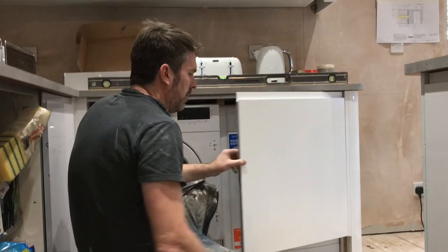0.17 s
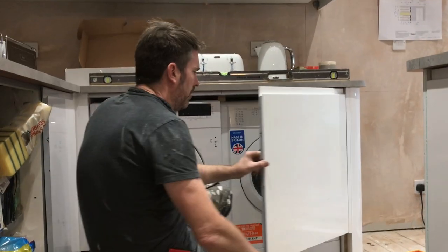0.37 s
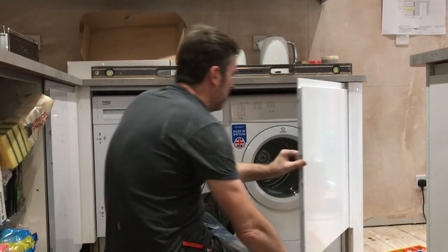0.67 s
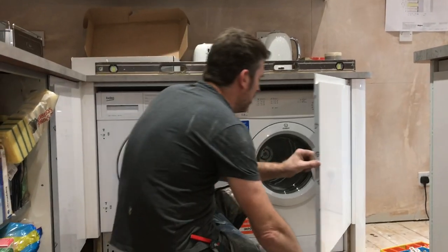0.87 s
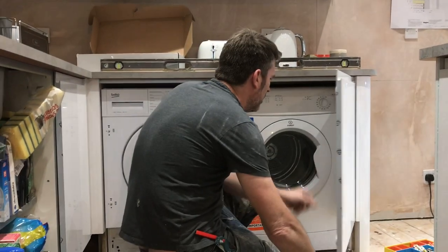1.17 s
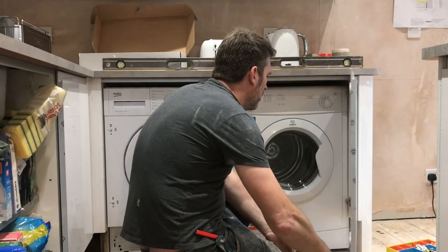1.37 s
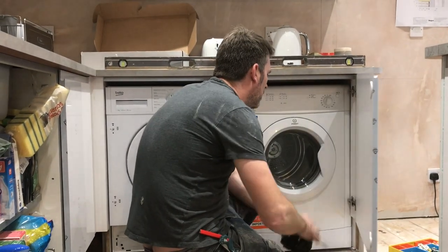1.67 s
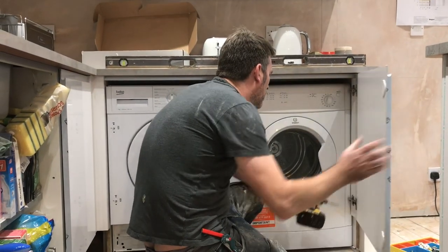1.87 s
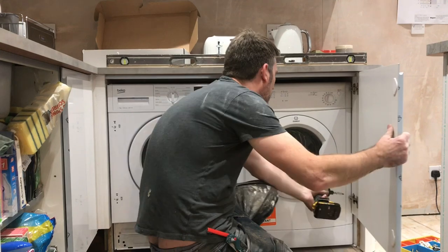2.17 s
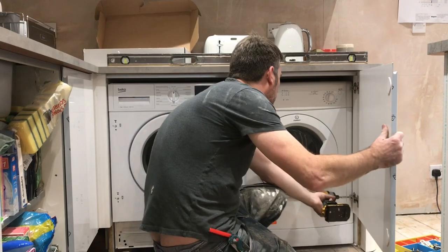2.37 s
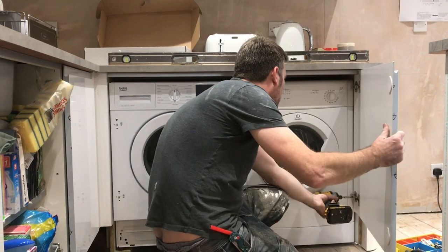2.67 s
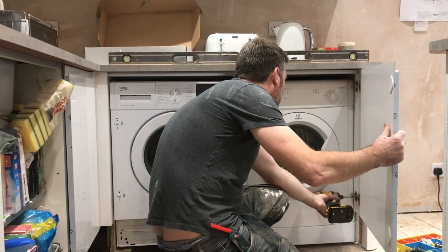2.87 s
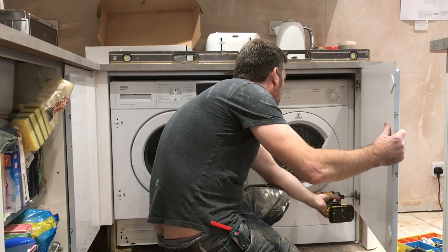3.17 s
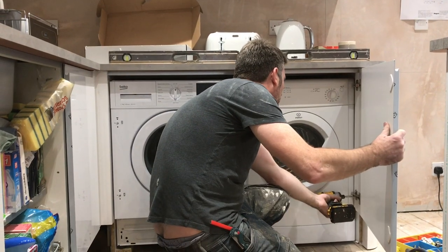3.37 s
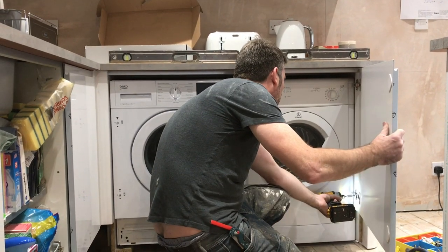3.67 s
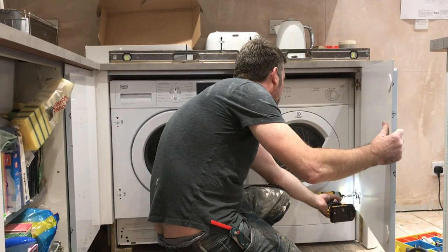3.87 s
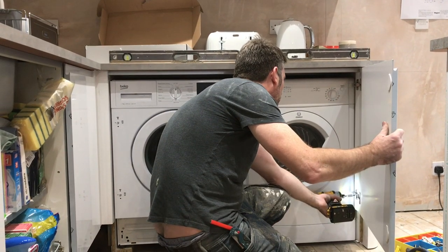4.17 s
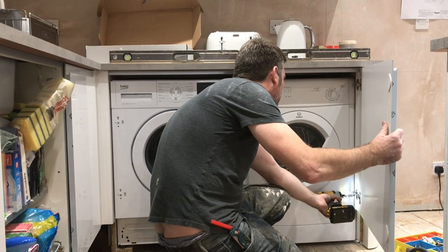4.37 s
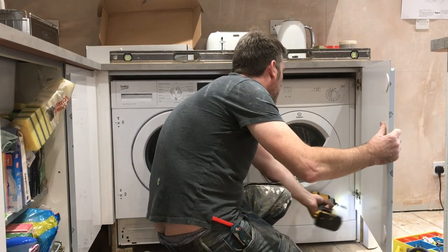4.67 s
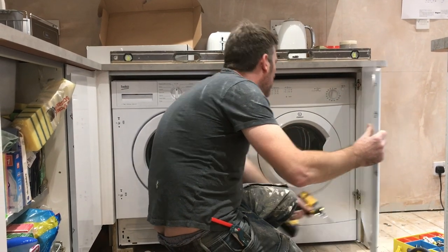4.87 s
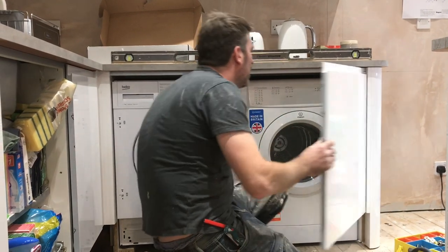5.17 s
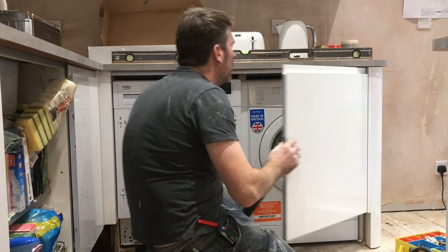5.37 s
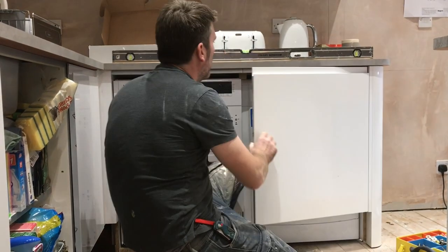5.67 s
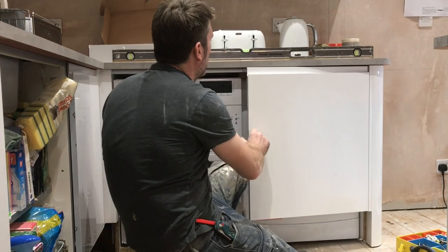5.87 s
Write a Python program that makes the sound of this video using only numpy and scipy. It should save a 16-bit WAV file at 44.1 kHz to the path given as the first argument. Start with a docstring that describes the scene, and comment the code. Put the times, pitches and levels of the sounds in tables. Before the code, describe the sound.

In a small, lightly echoing kitchen, a cabinet door opens with a loud sharp knock, rattle and dull thumps. Clothes rustle, a hinge groans briefly, and a drill scrapes across floorboards. Small clicks precede a short, quiet drill whine with grinding gears and a final growl. Soft taps and heavy dull thumps close the door. The microphone is fairly near, over a faint low hum.

```python
"""A cabinet door in a small kitchen is pulled open with a sharp knock and a rattle, and its hinge groans briefly.
Its panel cracks and rings, and dull thumps, soft taps and small clicks follow, each built from fading tones and noise.
A cordless drill is dragged off the ringing floorboards in irregular slips, its bit clicks into a hinge screw and
turns it slowly: steady whining tones, grinding gear noise and a growl. The door is pushed shut with taps and thumps.
Clothes rustle as shaped noise, over room air and a low hum."""
import sys
import numpy as np
from scipy import signal
from scipy.fft import rfft, irfft, next_fast_len
from scipy.io import wavfile
from scipy.ndimage import map_coordinates

SR = 44100
rng = np.random.default_rng(int(sys.argv[2]) if len(sys.argv) > 2 else 0)


def transcribe(signal):
    """Save signal, clipped to [-1, 1], as a 16-bit WAV file at the path in sys.argv[1]."""
    frames = np.atleast_2d(signal).T
    limited = np.clip(frames, -1, 1)
    pcm = np.round(limited * 32767).astype(np.int16)
    wavfile.write(sys.argv[1], SR, pcm)


N = 264732
TIME = np.arange(N) / SR
HIT = np.arange(SR // 2) / SR  # seconds since a blow
HIT_HZ = np.fft.rfftfreq(len(HIT), 1 / SR)
HOLLOW_HZ = 259  # the hollow answer that follows thumps and taps

# How long the kitchen rings. Each row: pitch in Hz, time to fade by 60 dB in seconds.
ROOM = [(80, 0.45), (250, 0.47), (1000, 0.47), (3000, 0.39), (6000, 0.36), (15000, 0.11)]


def amp(db):
    """Decibels to gain."""
    return 10 ** (np.asarray(db) / 20)


def unit(x):
    """Scale to rms 1."""
    return x / np.sqrt(np.mean(x ** 2) + 1e-20)


def burst(x):
    """Scale to the energy of 10 ms at rms 1."""
    return x * np.sqrt(SR / 100 / np.sum(x ** 2))


def fade(t, t60):
    """Exponential decay of 60 dB in t60 seconds."""
    return amp(-60 * t / t60)


def along(points, hz):
    """Read (Hz, value) points on a log axis."""
    f, v = np.transpose(points)
    return np.interp(np.log(hz + 1e-6), np.log(f), v)


def wobble(rate):
    """A smooth random curve with this many random points a second."""
    return map_coordinates(rng.standard_normal(int(N * rate / SR) + 4), [TIME * rate])


def filtered(x, response):
    """Shape x by a gain that depends on frequency."""
    m = next_fast_len(N + SR // 2)
    hz = np.fft.rfftfreq(m, 1 / SR)
    return irfft(rfft(x, m) * response(hz), m)[:N]


def noise(spectrum):
    """Coloured noise of rms 1."""
    return unit(filtered(rng.standard_normal(N), lambda hz: amp(along(spectrum, hz))))


def resonant(x, modes):
    """Ring x through (Hz, width, dB) resonances, at rms 1."""
    def response(f):
        total = 0
        for k, (center, width, db) in enumerate(modes):
            damping = 1j * f * width
            total = total + (-1) ** k * amp(db) * damping / (center ** 2 - f ** 2 + damping)
        return total
    return unit(filtered(x, response))


def slips(per_s):
    """Irregular little jerks of random size."""
    return (rng.random(N) < per_s / SR) * rng.standard_normal(N)


def swing(hz, t60, rise):
    """One damped tone set going by a soft push."""
    return np.sin(2 * np.pi * hz * HIT) * fade(HIT, t60) * (1 - np.exp(-HIT / rise))


def stroke(start, end, attack, release):
    """Rise over the attack, hold until the end, then lose 60 dB over the release."""
    return np.clip((TIME - start) / attack, 0, 1) * fade(np.maximum(TIME - end, 0), release)


def swell(s, rise, fall):
    """Exponential growth up to time s and decay after it."""
    return np.exp(-np.maximum((s - TIME) / rise, (TIME - s) / fall))


def contact(gain, chatter_db, t60, rise):
    """Surfaces graze, meet after the rise time and chatter away, coloured by the gain."""
    # turn the gain into a filter that never sounds before the blow
    cepstrum = irfft(np.log(np.maximum(gain, 1e-6)))
    half = len(HIT) // 2
    colour = np.exp(rfft(np.r_[cepstrum[0], 2 * cepstrum[1:half]], len(HIT)))
    blow = burst(signal.unit_impulse(len(HIT), round(rise * SR)))
    grazing = np.minimum(HIT / rise, 1) ** 2
    chatter = burst(rng.standard_normal(len(HIT)) * grazing * fade(HIT, t60))
    return burst(irfft(rfft(blow + amp(chatter_db) * chatter) * colour))


def in_room(x, wet_db):
    """The sound plus a fresh random tail of the kitchen, which builds up as the walls answer."""
    hz, t, z = signal.stft(rng.standard_normal(len(HIT)), SR, nperseg=256)
    decay = fade(t, along(ROOM, hz)[:, None])
    tail = signal.istft(z * decay, SR, nperseg=256)[1][:len(HIT)]
    tail = tail * (1 - np.exp(-HIT / 0.0008))
    return x + amp(wet_db) * signal.fftconvolve(x, tail / np.linalg.norm(tail))[:len(x)]


def add(track, s, sound):
    """Mix a sound into the track at time s."""
    part = track[max(round(s * SR), 0):][:len(sound)]
    part += sound[:len(part)]


def knocks(count=3):
    """After each knock the loose door rattles, each contact later, weaker and softer than the last."""
    # Hard knocks of the door. Each row: start in seconds, level in dB, Hz above which the contact is soft.
    knock_rows = [(0.0, -24.5, 5500), (0.018, -30, 4570), (0.040, -16, 12000), (0.093, -33.5, 895),
                  (0.117, -26.5, 1202), (0.154, -35.5, 800), (0.194, -38.5, 780), (0.713, -52.5, 1400),
                  (0.803, -58.5, 2000), (4.679, -50, 3990), (5.492, -46, 2000), (5.733, -41, 2490),
                  (5.777, -50.5, 2560), (5.948, -56, 1500)]
    gap_s, slows, loss_db, softens = .011, 1.5, 9.5, 0.54
    out = np.zeros(N)
    for s, db, soft_hz in knock_rows:
        for k in range(count):
            add(out, s, amp(db - k * loss_db) * knock(soft_hz * softens ** k))
            unevenness = np.exp(0.11 * rng.standard_normal())
            s = s + gap_s * slows ** k * unevenness
    return out


def knock(soft_hz, ring_db=-3, wet_db=-5.5, steepness=.62):
    """The door panel cracks and rings; softer contacts lose their treble."""
    # Colour of the crack. Each row: pitch in Hz, level in dB.
    panel_colour = [(40, -25), (100, -6.5), (180, 0.5), (260, -3.5), (400, -6), (600, -6.5), (900, -7.5),
                    (1150, -12), (1600, -10), (1950, -13), (2500, -16), (3200, -22), (4200, -25.5),
                    (6200, -35), (9000, -36), (16000, -47.5)]
    # Tones at which the door rings. Each row: pitch in Hz, level in dB, time to fade by 60 dB in seconds.
    panel_tones = [(174, 2, .25), (368, -0.5, 0.53), (519.2, 3, 0.083), (679, -5.5, 0.25), (717, -5, 0.45),
                   (812, -1, .3), (867, -4, 0.25), (1039, -13, 0.51), (1125, -9.5, 0.57), (1260, -1.5, .14),
                   (1530, -0.5, 0.26), (1752, -14, .45)]

    def softness(hz):
        return (1 + (hz / soft_hz) ** 2) ** -steepness

    crack_gain = amp(along(panel_colour, HIT_HZ)) * softness(HIT_HZ)
    crack = contact(crack_gain, chatter_db=12, t60=0.04, rise=.002)
    ring = np.zeros(len(HIT))
    for hz, level, t60 in panel_tones:
        push = rng.choice([-1, 1]) * amp(level + rng.normal(0, 2))
        ring += push * softness(hz) * swing(hz, t60, rise=0.0028)
    return in_room(crack, wet_db) + amp(ring_db) * burst(ring)


def thumps(rise=0.0028, body_db=-12, wet_db=-11, corner=3, tiring=1.8, count=3):
    """Padded blows swing the panel, shake the carcass and rebound ever weaker; lower ones are duller."""
    # Dull thumps of door, carcass and floor. Each row: start in seconds, level in dB, pitch in Hz,
    # time between rebounds in seconds, loss per rebound in dB (grows faster later), hollow answer in dB.
    thump_rows = [(0.044, -16.5, 176, .027, 7, -12), (0.086, -27, 105, .02, 15, -18),
                  (0.115, -22, 121, .02, 14, -17), (0.153, -12.5, 126, 0.019, 15, -29),
                  (0.193, -18.5, 140, 0.0097, 13, -22), (0.478, -21.5, 89, .034, 10, -27),
                  (0.579, -36.5, 85, .04, 6, -10), (0.731, -29.5, 95, .045, 12, -18),
                  (0.746, -26.5, 129, .032, 3, -17), (0.796, -28, 82, 0.042, 9.5, -7.5),
                  (0.832, -29.5, 169, 0.038, 22, -11), (1.219, -27, 240.5, .0208, 4.5, -20),
                  (2.11, -49.5, 70, .05, 10, -8.5), (3.346, -41.5, 154, .04, 7, -12),
                  (3.865, -36.5, 161.5, 0.032, 5, -14), (4.68, -34.5, 86, .04, 1, -17.5),
                  (5.484, -19, 122, .05, 9, -12), (5.496, -15, 152, .026, 13, -26),
                  (5.723, -15.5, 121.6, 0.067, 4.5, -11.5), (5.757, -25, 185, 0.041, 7, -3),
                  (5.842, -22.5, 114.4, .033, 22, -14), (5.946, -45, 100, .028, 2, -15)]
    # Colour of the shaken carcass. Each row: pitch in Hz, level in dB.
    carcass_colour = [(30, -28), (70, -4), (120, 4.5), (260, -5.5), (450, -22), (850, -24), (1500, -30),
                      (3500, -33.5), (6500, -54.5), (16000, -67.5)]
    swing_t60_s, hollow_t60_s = .1, .15
    out = np.zeros(N)
    for s, db, hz, gap, loss_db, hollow_db in thump_rows:
        padding = 1 / np.sqrt(1 + HIT_HZ / (corner * hz))
        gain = amp(along(carcass_colour, HIT_HZ)) * padding
        hollow = amp(hollow_db) * swing(HOLLOW_HZ, hollow_t60_s, rise)
        tones = swing(hz, swing_t60_s, rise) + hollow
        for k in range(count):
            body = contact(gain, chatter_db=21.5, t60=0.25, rise=0.0054)
            blow = in_room(tones + amp(body_db) * body, wet_db)
            add(out, s + k * gap, amp(db - k ** tiring * loss_db) * blow)
    return out


def taps(rise=0.0024, scuff_db=-10, wet_db=-9, hollow_rise=0.0034):
    """A light tap or a ringing floorboard swells one damped tone with a scuff; a hollow tone answers just after."""
    # Soft taps on wood, and floorboard tones that ring as the drill is dragged (1.280, 1.352).
    # Each row: start in seconds, level in dB, pitch in Hz, time to fade by 60 dB in seconds, hollow answer in dB.
    tap_rows = [(1.280, -40, 531, 0.24, -23), (1.352, -34, 782, 0.038, -22), (1.487, -50, 563, 0.04, -10),
                (1.621, -55, 1130, 0.1, -17), (5.385, -25, 974, 0.027, 0), (5.442, -25, 829, 0.042, 3),
                (5.482, -36, 837, 0.038, -1)]
    # Colour of the scuff. Each row: pitch in Hz, level in dB.
    scuff_colour = [(60, -15), (300, 2), (1000, 0), (1500, -20.5), (4000, -28.5), (6500, -52), (9500, -49),
                    (16000, -52.5)]
    hollow_t60_s, hollow_lag_s = 0.12, 0.00923
    low_swing_hz, low_swing_db = 113, -4  # a deeper tone in the hollow answer
    answer = swing(HOLLOW_HZ, hollow_t60_s, hollow_rise)
    answer += amp(low_swing_db) * swing(low_swing_hz, hollow_t60_s, hollow_rise)
    out = np.zeros(N)
    for s, db, hz, t60, hollow_db in tap_rows:
        scuff = contact(amp(along(scuff_colour, HIT_HZ)), chatter_db=3.5, t60=0.097, rise=.005)
        touch = swing(hz, t60, rise) + amp(scuff_db) * scuff
        add(out, s, amp(db) * in_room(touch, wet_db))
        add(out, s + hollow_lag_s, amp(db + hollow_db) * in_room(answer, wet_db))
    return out


def clicks(snap_wet_db=-2):
    """Small hard parts meet: a pitched clack, a bright snap and a low thud sound together."""
    # Small clicks: a close dry one of clothes or tool belt (0.392), then hinge, bit and screw.
    # Each row: start in seconds, level in dB, pitch in Hz, bright snap in dB,
    # time until the surfaces meet in seconds, room sound in dB.
    click_rows = [(0.392, -48, 2963, -9, .002, -6), (1.328, -58, 2660, -10.5, 0.0077, -11),
                  (1.992, -55.5, 1790, 9, 0.0039, -4), (2.772, -50, 2000, -16.5, .004, -2),
                  (2.834, -51.5, 1900, -22, .006, 1), (3.094, -56, 1990, -33, 0.006, 2),
                  (3.116, -44, 1890, -26, 0.0046, 1), (3.124, -37, 1840, -18, .0033, -4),
                  (3.254, -49.5, 1670, -32, 0.0043, -2), (3.348, -60, 1310, -24, 0.00365, -4),
                  (3.408, -63, 1950, -6, .002, -6), (3.737, -66.5, 2700, 4.5, .0028, -1),
                  (3.861, -39.5, 2930, -6.5, .002, -1.5), (3.916, -58, 2410, -6.5, 0.0014, -10),
                  (4.467, -54.5, 1830, -18, .010, -1.5), (4.908, -65, 1992, -3.5, .004, -3.5),
                  (5.944, -58.5, 1815, -0.5, .007, -0.5)]
    # Colour of the clack. Each row: multiple of the click's pitch, level in dB.
    clack_colour = [(.05, -16), (.2, -8.5), (.45, -7), (.7, -2.5), (.95, 1.5), (1.4, -6), (1.85, -20),
                    (4, -59), (9, -27)]
    # Colour of the bright snap. Each row: pitch in Hz, level in dB.
    snap_colour = [(300, -42.5), (1500, -5), (3000, -3.5), (4400, -3), (6200, -7), (8500, -9.5),
                   (12000, -14.5), (16000, -16.5)]
    thud = amp(-3) * swing(164, t60=0.16, rise=0.0063)
    out = np.zeros(N)
    for s, db, hz, snap_db, seating, wet_db in click_rows:
        clack = contact(amp(along(clack_colour, HIT_HZ / hz)), chatter_db=13, t60=0.055, rise=seating)
        snap = contact(amp(along(snap_colour, HIT_HZ)), chatter_db=14, t60=0.076, rise=seating)
        bright = amp(snap_db) * in_room(snap, wet_db + snap_wet_db)
        add(out, s, amp(db) * (in_room(clack, wet_db) + bright + thud))
    return out


def groan(fundamental_db=-3, third_db=-14, rough_db=3, jitter=0.036):
    """The hinge sticks and slips: a short rough tone that rises and sinks, strongest on its second partial."""
    start_s, end_s, groan_db = 0.348, .47, -49
    low_hz, top_hz, top_s, arch_s = 155, 210.6, .455, .07
    hz = low_hz + (top_hz - low_hz) * np.exp(-((TIME - top_s) / arch_s) ** 2)
    phase = 2 * np.pi * np.cumsum(hz * (1 + jitter * wobble(116.9))) / SR
    level = amp(groan_db + rough_db * wobble(101.6)) * stroke(start_s, end_s, attack=.03, release=.06)
    tone = np.zeros(N)
    for k, db in enumerate([fundamental_db, 0, third_db], 1):
        tone += amp(db) * np.sin(k * phase)
    return in_room(level * tone, wet_db=-10)


def drag(grit_db=-8):
    """Irregular slips of the drill's battery ring the floorboards and grind the dust, in one easing stroke."""
    # Resonances of the floorboards. Each row: pitch in Hz, width in Hz, level in dB.
    board_tones = [(224, 105, 1), (365, 58, -0.5), (542, 10, -15), (713, 67, -2.5), (835, 72, -8.5),
                   (1042, 23, -6), (1240, 110, -17.5), (1700, 110, -14), (2000, 230, -16.5)]
    # Colour of the dust under the battery. Each row: pitch in Hz, level in dB.
    grit_colour = [(200, -6), (500, 12), (2000, -7), (3500, -8.5), (6000, -31), (16000, -43)]
    start_s, end_s, drag_db, ease_db_per_s = 1.205, 1.354, -44, 35
    eased_db = ease_db_per_s * np.maximum(TIME - start_s, 0)
    force = amp(drag_db - eased_db) * stroke(start_s, end_s, attack=.015, release=0.11)
    scrape = resonant(slips(per_s=1300), board_tones) + amp(grit_db) * noise(grit_colour)
    return in_room(force * scrape, wet_db=-5.0)


def drill(flutter_db=1.6, grind_db=1.0, casing_db=-6, turn_hz=106, throb=0.25, motor_db=-66, linger_db=-8):
    """The motor sings at its switching rate, the gears spin up and grind, the screw growls as it tightens."""
    # Partials of the whine. Each row: multiple of the whine's pitch, level in dB.
    whine_partials = [(1, -2), (2, -3.5), (3, -10), (4, -22)]
    # Colour of the gear noise. Each row: pitch in Hz, level in dB.
    gear_colour = [(200, -4), (450, -4.5), (1300, 1.5), (2200, -2.5), (3000, -1), (4600, -0.5),
                   (5600, -11.5), (6500, -12.5), (9000, -14), (12000, -17), (16000, -25)]
    # Resonances of the drill's casing. Each row: pitch in Hz, width in Hz, level in dB.
    casing_tones = [(734, 28, -2), (1270, 82, 3), (1745, 57, 0.5), (2016, 40, 4), (3280, 45, -5),
                    (4520, 57, -36), (5480, 99, -1.5)]
    # Resonances of the screw turning in the board. Each row: pitch in Hz, width in Hz, level in dB.
    growl_tones = [(650, 100, -4), (764, 66, 1.5), (970, 93, -4)]
    # Colour of the shake carried into the cabinet. Each row: pitch in Hz, level in dB.
    shake_colour = [(60, -12), (150, 4.5), (450, 0), (650, -18), (1500, -26), (16000, -64.5)]
    trigger_on_s, trigger_off_s = 3.709, 4.308  # one pull of the trigger
    whine_hz, whine_db, whine_attack_s, whine_release_s = 3900, -61, .006, 0.069
    gear_db, spin_up_s, spin_down_s = -60, 0.089, 0.19
    growl_db, tighten_db_per_s = -61.5, 96  # growl once the screw is tight, and how fast it builds up

    def pull(attack, release):
        return stroke(trigger_on_s, trigger_off_s, attack, release)

    phase = 2 * np.pi * whine_hz * TIME + 0.26 * wobble(50)
    whine = np.zeros(N)
    for k, db in whine_partials:
        lingering = amp(linger_db) * pull(spin_up_s, along(ROOM, k * whine_hz))  # in the room
        sung = pull(whine_attack_s, whine_release_s) + lingering
        whine += np.sqrt(2) * amp(db + flutter_db * wobble(30)) * sung * np.sin(k * phase)

    # the gear mesh tightens once a turn
    turn_phase = 2 * np.pi * np.cumsum(turn_hz * (1 + 0.024 * wobble(8))) / SR
    shaft = 1 + throb * np.sin(turn_phase)
    casing = amp(casing_db) * resonant(slips(per_s=700), casing_tones)
    gears = unit((noise(gear_colour) + casing) * shaft * amp(grind_db * wobble(250)))
    shake = amp(motor_db) * noise(shake_colour)
    turning = pull(spin_up_s, spin_down_s) * (amp(gear_db) * gears + shake)

    slack_db = tighten_db_per_s * np.maximum(trigger_off_s - TIME, 0)
    growl = amp(growl_db - slack_db) * pull(spin_up_s, 0.27) * resonant(slips(per_s=310), growl_tones)
    return amp(whine_db) * whine + in_room(turning + growl, wet_db=-1.5)


def clothes(grain_db=1.0, still_db=-83):
    """Fabric rubs in small catches, swelling as the body shifts, with quick brighter swishes."""
    # Body shifts. Each row: peak time in seconds, level in dB, swell in seconds, fade in seconds.
    move_rows = [(0.5, -60.5, .05, 0.24), (1.3, -64.5, 0.36, 0.14), (1.65, -67, .08, 0.44),
                 (4.65, -67.5, 0.11, 0.29), (5.46, -62, .12, .35), (6.0, -61.5, .05, .1)]
    # Colour of the cloth. Each row: pitch in Hz, level in dB.
    cloth_colour = [(200, -9.5), (1200, 14.5), (2200, 5), (4000, 4.5), (6200, -5.5), (9000, -3.5),
                    (13000, -6), (16000, -12)]
    # Quick swishes of sleeve and palm. Each row: peak time in seconds, level in dB, half-length in seconds.
    swish_rows = [(0.567, -69, .02), (0.657, -63.5, .015), (0.802, -60.5, .013), (1.03, -69.5, .016),
                  (1.578, -63.5, .05), (4.676, -63, .04), (5.398, -59, .012), (5.494, -59.5, .008),
                  (5.734, -56, .011), (5.779, -63.5, .04)]
    # Colour of the swishes. Each row: pitch in Hz, level in dB.
    swish_colour = [(300, -27), (1500, 3.5), (4000, 5.5), (6200, -1.5), (9500, 2.5), (13000, -1.5),
                    (16000, -3.5)]
    power = amp(still_db) ** 2
    for s, db, rise, fall in move_rows:
        power = power + (amp(db) * swell(s, rise, fall)) ** 2
    rustle = np.sqrt(power) * noise(cloth_colour)
    swish_level = sum(amp(db) * swell(s, half, half) for s, db, half in swish_rows)
    catches = unit(amp(grain_db * wobble(120)))
    return (rustle + swish_level * noise(swish_colour)) * catches


def background():
    """Room air as coloured noise, and a slightly unsteady appliance hum of a few tones."""
    # Tones of the hum. Each row: pitch in Hz, level in dB.
    hum_tones = [(48.4, -66.5), (96.9, -65.5), (145.3, -66.5), (288, -72), (1133, -81), (1735, -87.5)]
    # Colour of the room air. Each row: pitch in Hz, level in dB.
    air_colour = [(20, -34.5), (45, 0), (100, -1.5), (230, 0.5), (310, -9), (420, -17), (600, -17.5),
                  (850, -29), (1130, -24), (1400, -30.5), (2400, -28.5), (4200, -30.5), (6500, -37),
                  (15500, -40.5)]
    hum = np.zeros(N)
    for hz, db in hum_tones:
        hum += np.sqrt(2) * amp(db) * np.sin(2 * np.pi * hz * TIME + 0.21 * wobble(8))
    return hum + amp(-58.5) * noise(air_colour)


def scene():
    """All sources at one microphone."""
    door_and_clicks = knocks() + thumps() + taps() + clicks() + groan()
    tool = drag() + drill()
    return (door_and_clicks + tool + clothes() + background())[None]


def record(dry, low_cut_hz=52, top_hz=15850):
    """The microphone sheds deep bass and nothing is kept above the band limit."""
    thinned = filtered(dry[0], lambda hz: 1 / np.sqrt(1 + (low_cut_hz / (hz + 1)) ** 10))
    return filtered(thinned, lambda hz: hz < top_hz)[None]


dry = scene()
out = record(dry)
transcribe(out)
```